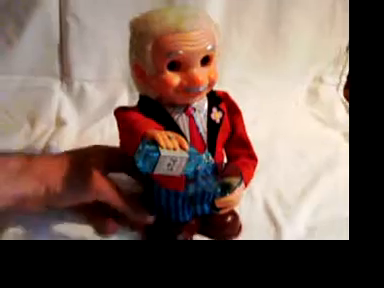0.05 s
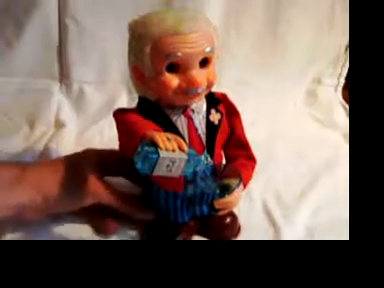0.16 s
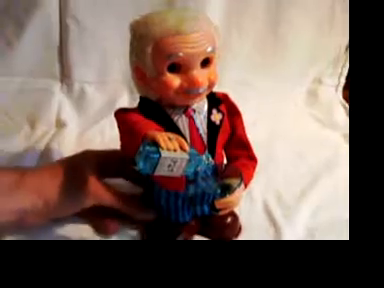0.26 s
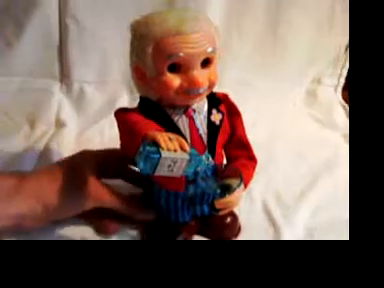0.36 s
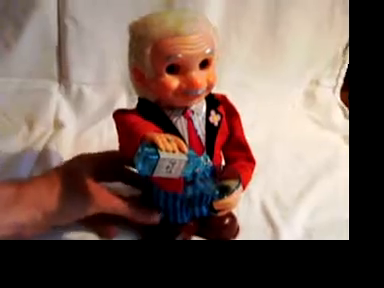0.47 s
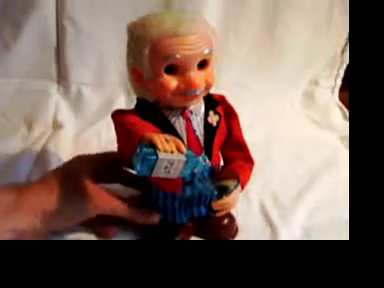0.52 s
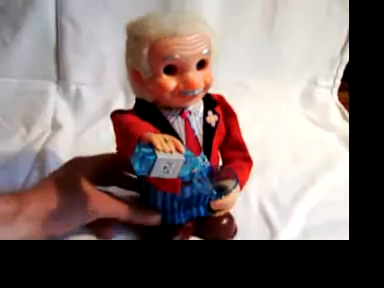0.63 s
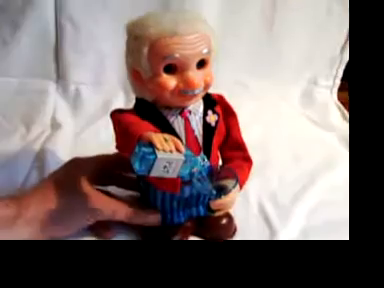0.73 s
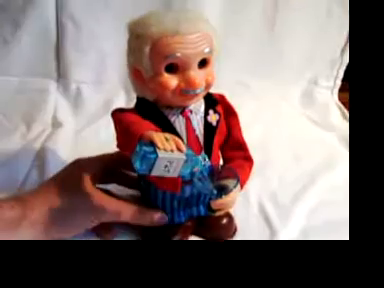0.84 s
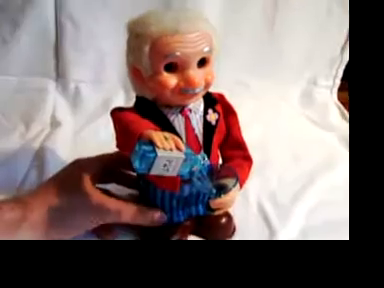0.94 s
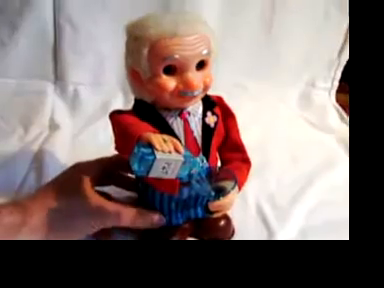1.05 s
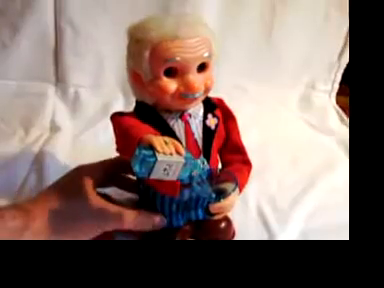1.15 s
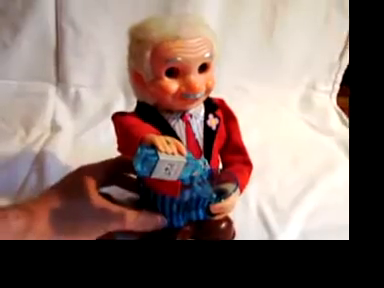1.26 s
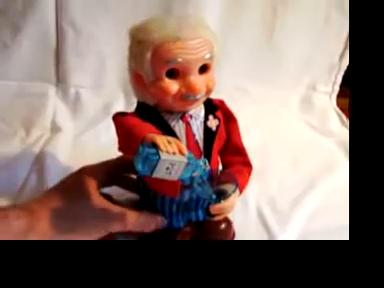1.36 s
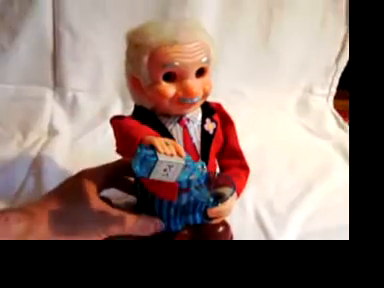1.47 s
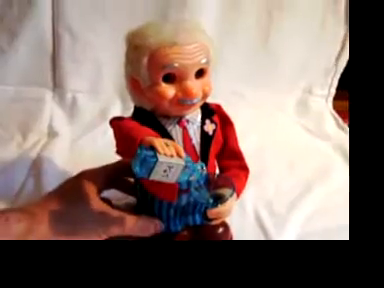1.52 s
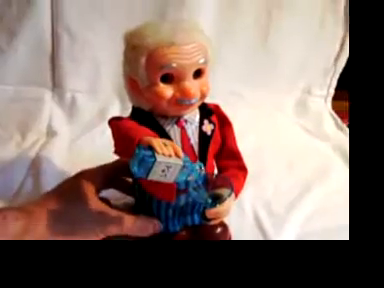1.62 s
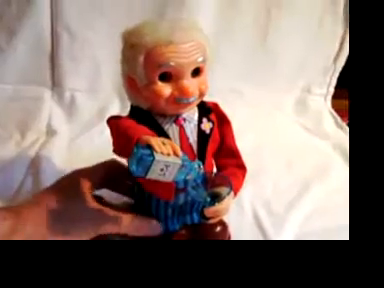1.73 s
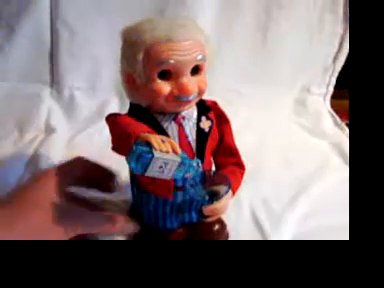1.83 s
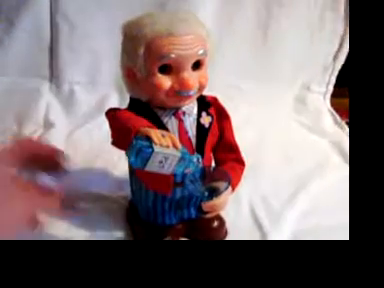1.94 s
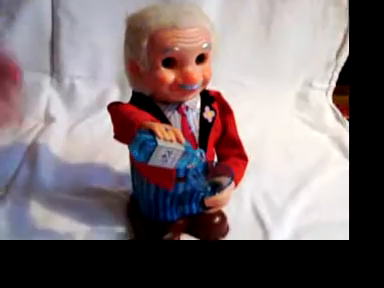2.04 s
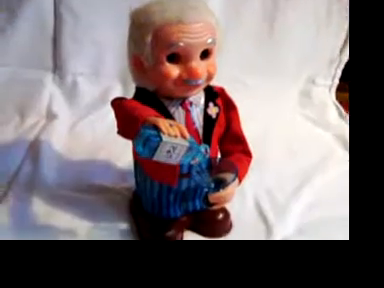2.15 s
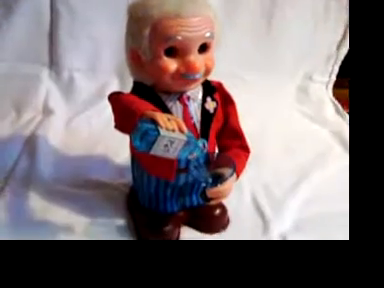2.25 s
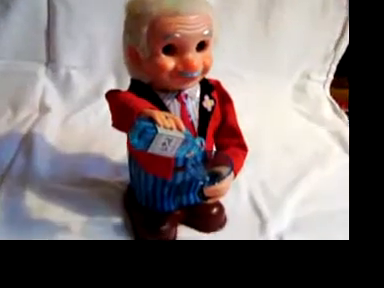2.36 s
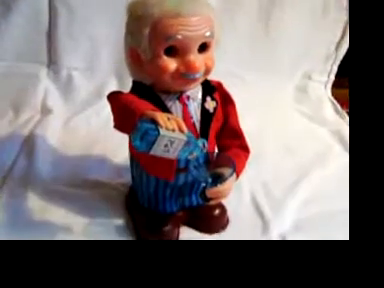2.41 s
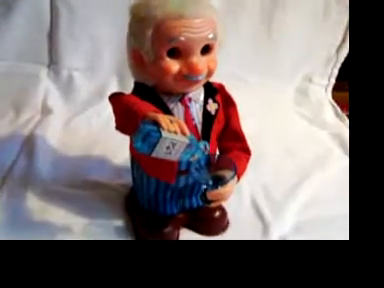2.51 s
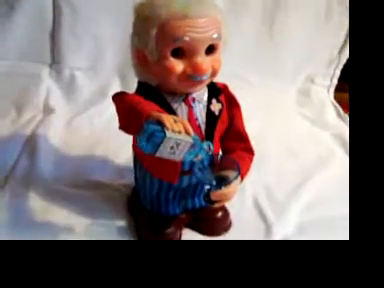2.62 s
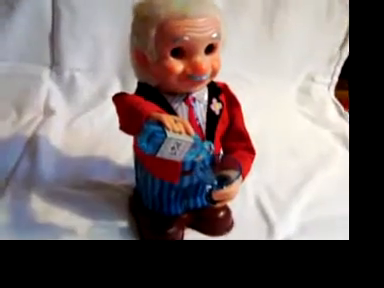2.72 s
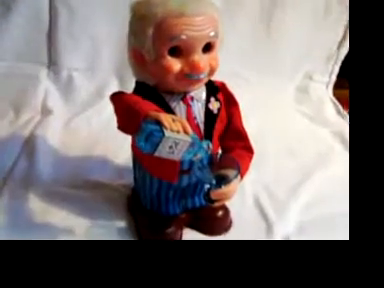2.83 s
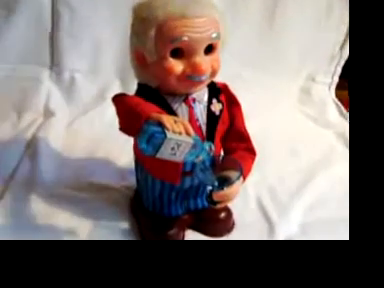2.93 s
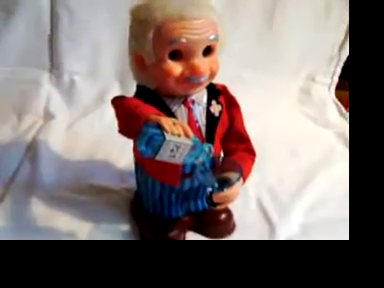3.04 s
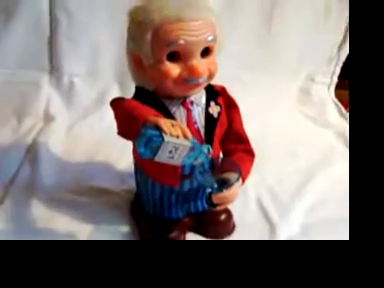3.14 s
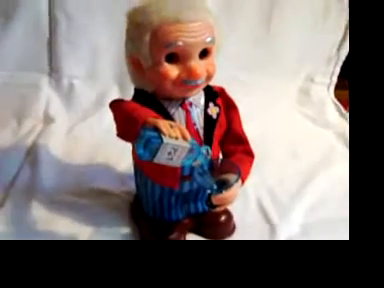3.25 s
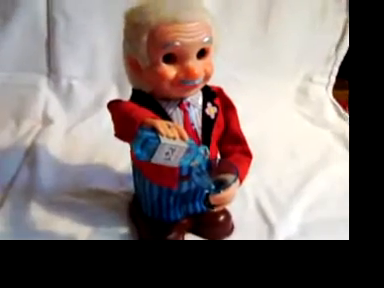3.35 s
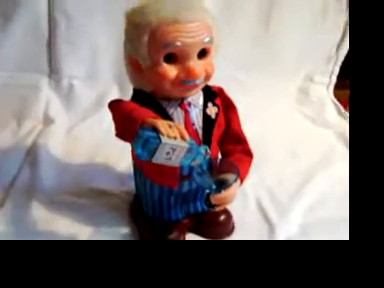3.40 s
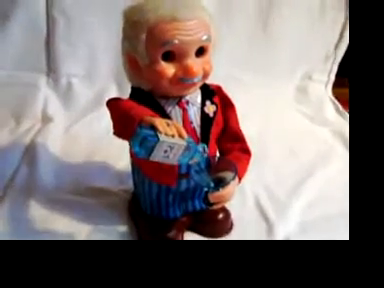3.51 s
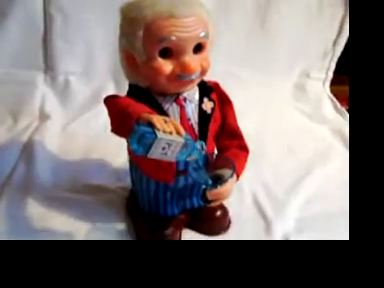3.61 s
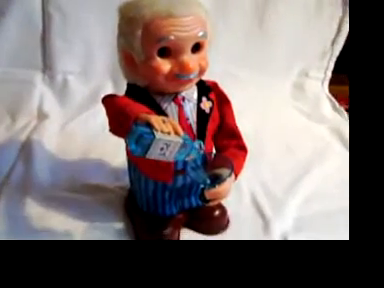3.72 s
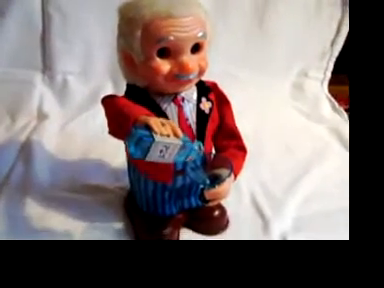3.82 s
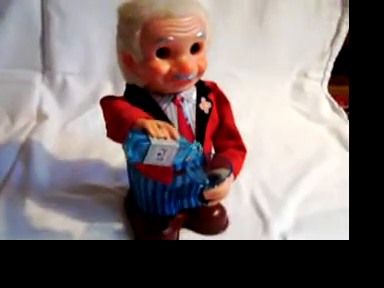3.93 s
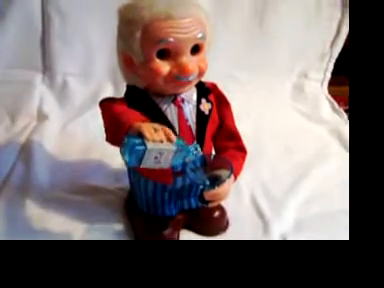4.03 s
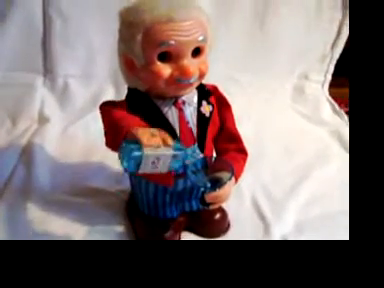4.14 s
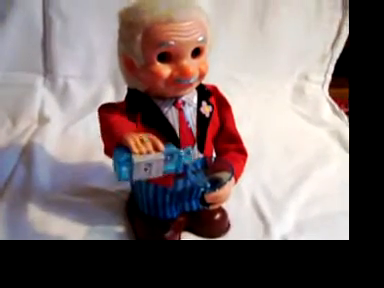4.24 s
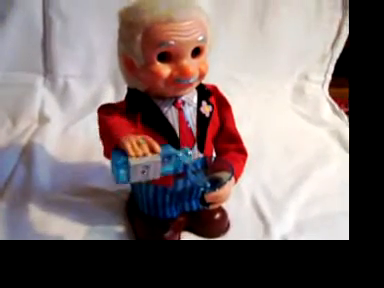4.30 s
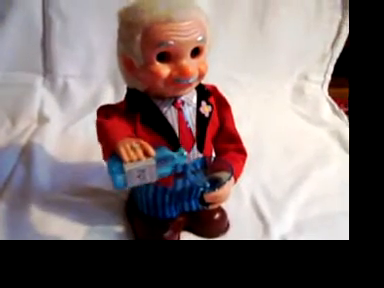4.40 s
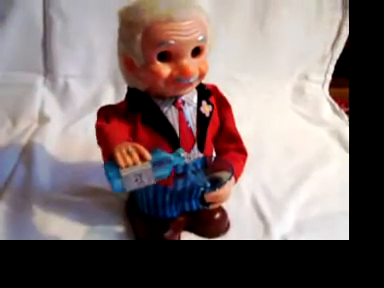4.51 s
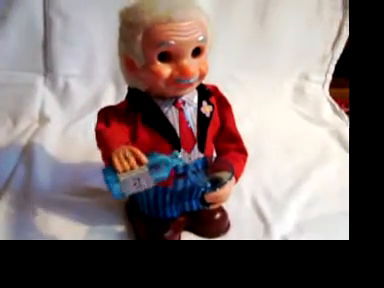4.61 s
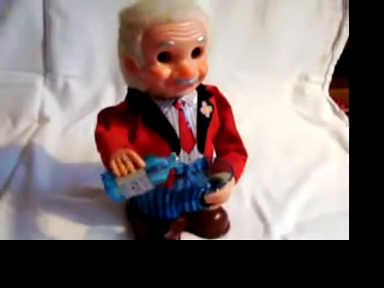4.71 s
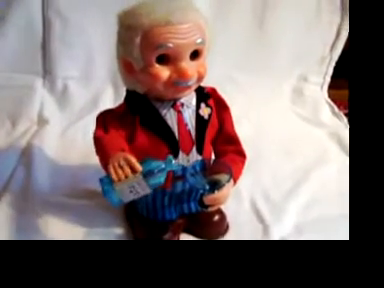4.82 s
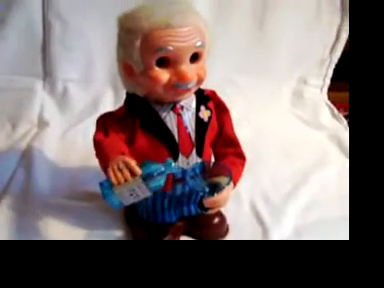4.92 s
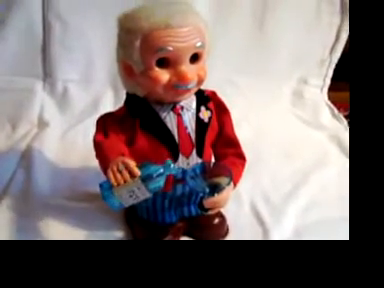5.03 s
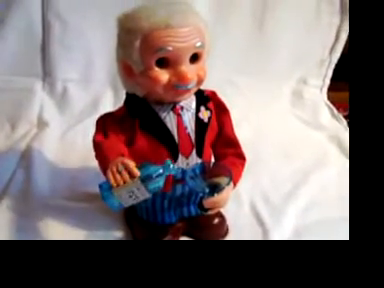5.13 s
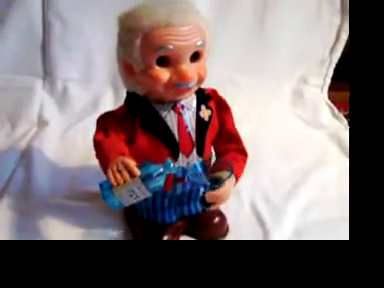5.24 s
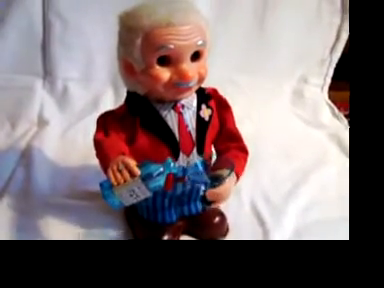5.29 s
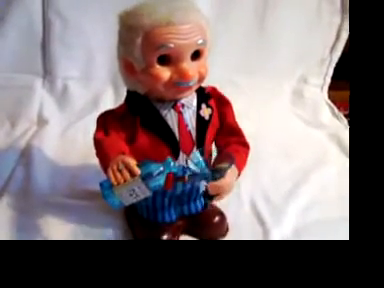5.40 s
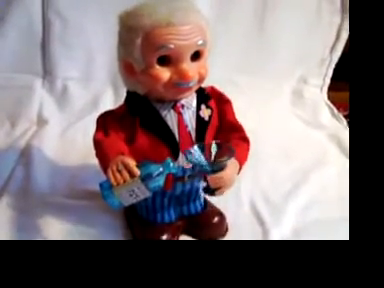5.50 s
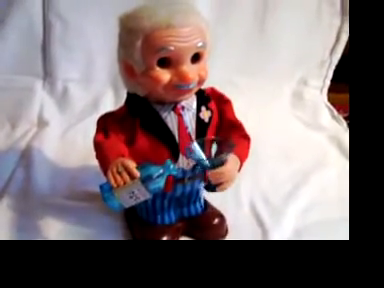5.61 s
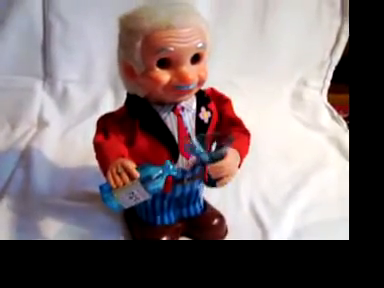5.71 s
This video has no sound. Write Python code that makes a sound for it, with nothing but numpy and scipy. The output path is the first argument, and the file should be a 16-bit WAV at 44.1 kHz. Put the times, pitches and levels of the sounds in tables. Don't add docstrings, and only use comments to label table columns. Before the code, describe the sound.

Quiet room with low murmur and faint ticking. A finger clicks and slides a small switch, with a sharp snap at about one second. A tiny electric motor then spins up quickly and whirrs on, gears buzzing and rattling inside a tin toy on a table. Irregular bursts of hard gear slaps crackle and distort the close, narrow-band microphone, with occasional dull knocks.

```python
import sys
import numpy as np
from scipy import signal
from scipy.fft import rfft, irfft
from scipy.io import wavfile
from scipy.ndimage import uniform_filter1d, minimum_filter1d

SR = 44100
rng = np.random.default_rng(int(sys.argv[2]) if len(sys.argv) > 2 else 0)


def log_audio(samples):
    frames = np.atleast_2d(samples).T
    limited = np.clip(frames, -1, 1)
    pcm = np.round(limited * 32767).astype(np.int16)
    wavfile.write(sys.argv[1], SR, pcm)


def volts_from_decibels(level):
    exponent = np.asarray(level, float) / 20
    return 10 ** exponent


N = 254016
CEILING = 0.72

# [f/Hz, density/dB]
ROOM_SPECTRUM = [(5.9, -47), (10, -12.5), (109, -2.5), (151, -1), (167, -4), (215, -1), (276, -3),
                 (329, -10), (423, -1), (586, -1.5), (994, -14), (2060, -14), (3240, -21), (4060, -28),
                 (5280, -65), (8930, -120)]
# [t/s, peak level/dB]
TICKS = [(0.2344, -35.5), (0.2644, -34.5), (0.4044, -35), (0.4344, -37), (0.5594, -34), (0.5844, -37),
         (0.7144, -34), (0.789, -35), (0.8894, -35), (1.0594, -34.5), (1.1774, -32), (1.2194, -35)]
# [f/Hz, level/dB, t60/s]
TICK_MODES = [(1350, 2, 0.05), (2040, -3, .04), (2790, -1.5, .04)]
# [start t/s, length/s, f/Hz, level/dB]
TABLE_HUMS = [
    (1.467, 0.35, 117.5, -49.5),
    (2.65, 0.19, 124, -55),
    (2.7, .9, 80.4, -42.5),
    (3.6, .2, 117.5, -43),
    (3.694, .15, 78, -49),
    (4.0, 0.18, 111.3, -42),
    (4.185, .9, 75.9, -47.5),
    (4.305, .5, 117.5, -42),
    (4.998, .3, 122.1, -46.5),
    (3.09, 0.89, 239, -41.5),
]
# [t/s, blow level/dB, best-struck f/Hz, fall below it/dB per octave, fall above it/dB per octave]
SWITCH_CLICKS = [
    (0.5261, -13, 1980, 10.5, 11),
    (.7105, -31, 640, 9, 8),
    (0.7612, -16, 1350, 8, 14),
    (0.7638, -17, 710, 6.5, 3.7),
    (0.7682, -28, 1150, 4.5, 12),
    (.781, -29, 1100, 11, 11),
    (0.9807, -6.5, 900, 3.2, 4),
    (0.995, -17.5, 640, 5, 9.7),
    (1.032, -14.5, 1360, 2.2, 8.7),
    (1.289, -8, 1780, 22, 9),
]
# [f/Hz, t60/s]
SWITCH_MODES = [(640, 0.022), (1100, 0.0098), (1700, 0.014), (2550, 0.0098), (3650, 0.0067)]
# [t/s, peak level/dB, f/Hz, t60/s]
KNOCKS = [(.9808, -21, 430, .025), (1.4685, -14, 520, .02), (1.4685, -21, 90, .05), (2.399, -18, 500, .02),
          (2.765, -22, 150, .03), (3.0065, -3.5, 400, .03), (3.009, -9, 660, .03), (3.007, -11, 220, .03),
          (3.0845, -10, 480, .035), (3.1705, -10, 400, .035), (3.93, -25, 90, .05), (5.0535, -13, 380, .03),
          (5.0535, -10, 540, .032)]
# [t/s, shaft f/Hz, rattle level/dB, bearing load level/dB]
MOTOR = [(1.27, 149, -30, -5), (1.3, 155.7, -18, -2.5), (1.36, 170.9, -10, 3), (1.44, 187.2, -8, 1),
         (1.72, 187.4, -13.5, -1), (2.0, 183.8, -13, -3.5), (2.47, 173, -12.5, 0.5), (2.68, 199.7, -12, -2),
         (3.12, 196.1, -9, 0.5), (3.68, 196, -12, -2), (3.85, 199.6, -7.5, 4), (4.24, 197.2, -12, -7),
         (4.41, 196.8, -7, 3), (4.5, 197.3, -12.5, -2), (4.78, 194, -13, -7.5), (5.1, 181.2, -12.5, -1),
         (5.28, 189.6, -12.5, -5.5), (5.76, 177, -14, 3.5)]
# [shaft multiple, level at panel pitch/dB, panel f/Hz, width/Hz]
PANEL_HUMS = [(2, -33.5, 385, 72), (3, -28.5, 595, 81), (4, -29.5, 748, 72)]
# [shaft multiple, level/dB]
UPPER_ORDERS = [(1, -51), (6, -35), (7, -33.5), (12, -24)]
# [f/Hz, density/dB]
SHELL_SPECTRUM = [(150, -43.5), (250, -27), (323, -17), (380, -14.5), (433, -14.5), (593, -10), (636, -9.5),
                  (748, -11.5), (902, -10.5), (1130, -2), (1260, -11.5), (1370, -6.5), (1670, -1),
                  (2290, -2.5), (3980, -8), (5280, -93), (8930, -120)]
# [f/Hz, width/Hz, gain level/dB]
PANELS = [(500, 450, 14), (716, 71, 9), (1122, 74, 4.5), (1377, 178, 9.5), (1523, 37, 10), (1870, 74, 7.5),
          (2118, 160, 7.5), (2264, 89, 10.5), (2458, 150, 5.5), (2930, 160, 7)]
# [t/s, overload level/dB]
SLAPS = [(1.443, -29.5), (1.5674, -41), (2.1755, -27.5), (2.2287, -46), (2.2476, -45.5), (4.1229, -31),
         (4.7178, -39.5), (4.7799, -29), (4.8831, -42), (5.0564, -40), (5.3232, -30.5), (5.383, -50),
         (5.4485, -46), (5.4703, -41), (5.7283, -23), (4.7592, -43.5), (3.1295, -44), (5.7339, -46),
         (5.53, -50)]
# [hardest slap t/s, overload level/dB, chatter before/s, chatter after/s]
BURSTS = [(1.4709, -18.5, 0.0034, 0.00074), (1.5038, -24.5, 0, 0.022), (1.603, -23.5, 0.0082, 0.015),
          (1.7034, -27, 0.026, 0.026), (2.0883, -29.5, 0.0077, 0.043), (2.39, -31.5, 0.0025, 0.034),
          (2.4783, -28.5, 0.0028, 0.019), (2.5503, -33.5, .007, 0.008), (2.654, -21.5, 0.018, 0.013),
          (2.7051, -7, 0.0072, 0.038), (2.764, -25, 0.0097, 0.027), (2.8382, -30.5, 0.023, 0.0064),
          (2.8879, -25.5, 0.019, 0.0059), (2.9676, -19, 0.0066, .04), (3.0325, -25, 0.026, 0.059),
          (3.176, -18.5, 0.0036, 0.033), (3.2397, -24.5, 0.00049, 0.018), (3.3489, -28.5, 0.0084, 0.073),
          (3.5099, -19.5, 0.055, .036), (3.609, -26, 0.049, 0.082), (3.748, -17, 0.018, 0.065),
          (3.8426, -14, 0.021, .012), (3.8642, -12.5, .007, .026), (3.9035, -14.5, 0.034, 0.037),
          (3.98, -25, 0.0066, 0.031), (4.061, -19, 0.015, 0.027), (4.2154, -24.5, 0.0012, 0.029),
          (4.302, -25, 0.02, .026), (4.412, -13, 0.057, 0.005), (4.4482, -20, 0.00062, .026)]


def evened(x):
    return x / np.sqrt(np.mean(x ** 2) + 1e-20)


def curves(rows):
    t_s, *columns = np.transpose(rows)
    return [np.interp(np.arange(N) / SR, t_s, column) for column in columns]


def colour(x, points, peaks=()):
    f_hz = np.fft.rfftfreq(N, 1 / SR)
    point_hz, point_db = np.transpose(points)
    gain_db = np.interp(np.log(f_hz + 1), np.log(point_hz + 1), point_db, left=-90, right=-90)
    for centre_hz, width_hz, top_db in peaks:
        gain_db = gain_db + top_db / (1 + (2 * (f_hz - centre_hz) / width_hz) ** 2)
    return irfft(rfft(x) * volts_from_decibels(gain_db), N)


def drift(f_hz):
    lowpass = signal.butter(2, f_hz, fs=SR, output="sos")
    return evened(signal.sosfilt(lowpass, rng.standard_normal(N)))


def add(mix, t_s, sound):
    part = mix[round(t_s * SR):][:len(sound)]
    part += sound[:len(part)]


def ring(f_hz, t60_s, rise_s=0.000068):
    t = np.arange(6000) / SR
    return np.sin(2 * np.pi * f_hz * t) * volts_from_decibels(-60 * t / t60_s) * (1 - np.exp(-t / rise_s))


def room():
    murmur = evened(colour(rng.standard_normal(N), ROOM_SPECTRUM))
    return volts_from_decibels(-39.54 + 0.9 * drift(25)) * murmur


def ticking():
    out = np.zeros(N)
    tick = sum(volts_from_decibels(db) * ring(hz, t60_s, rise_s=0.00085) for hz, db, t60_s in TICK_MODES)
    for t_s, db in TICKS:
        add(out, t_s, volts_from_decibels(db - 5) * tick)
    return out


def table():
    t = np.arange(N) / SR
    rumble_spectrum = [(20, -28.5), (60, -5), (130, 2.5), (240, 8.5), (330, 3)]
    rumble = evened(colour(rng.standard_normal(N), rumble_spectrum, [(232.5, 6.6, 6)]))
    swell_db = 6.2 * np.exp(-((t - 4.7) / 2.1) ** 2)
    out = volts_from_decibels(-48.5 + swell_db + 1.3 * drift(1.3)) * rumble
    ease_s = 0.062
    for start_s, length_s, hz, db in TABLE_HUMS:
        inside_s = np.minimum(t - start_s, start_s + length_s - t)
        spell = np.clip(inside_s / ease_s + 0.5, 0, 1) ** 2
        out += np.sqrt(2) * volts_from_decibels(db) * spell * np.sin(2 * np.pi * hz * t)
    return out * np.clip((t - 1.28) / 0.05, 0, 1)


def finger_slide():
    out = np.zeros(N)
    start_s, length_s, level_db = 0.69, 0.15, -47
    stroke = np.hanning(round(length_s * SR))
    slips = rng.standard_normal(len(stroke)) ** 3 * stroke
    body = sum(ring(hz, t60_s) for hz, t60_s in SWITCH_MODES[:4])
    add(out, start_s, volts_from_decibels(level_db) * evened(signal.oaconvolve(slips, body)[:len(stroke)]))
    return out


def switch():
    out, t = np.zeros(N), np.arange(600) / SR
    tunes = rng.uniform(0.94, 1.03, (len(SWITCH_CLICKS), 5))
    for (t_s, db, best_hz, below, above), tune in zip(SWITCH_CLICKS, tunes):
        for k, (hz, t60_s) in enumerate(SWITCH_MODES):
            octaves = np.log2(hz / best_hz)
            blow_db = db - max(above * octaves, -below * octaves)
            sign = (-1) ** k
            add(out, t_s, sign * volts_from_decibels(blow_db) * ring(hz * tune[k], t60_s, rise_s=0.0001))
        band = signal.butter(1, [best_hz / 2, best_hz * 2], "band", fs=SR, output="sos")
        crack = evened(signal.sosfilt(band, rng.standard_normal(len(t))))
        add(out, t_s, volts_from_decibels(db - 19 - 60 * t / 0.0081) * crack)
    return out


def knocks():
    out = np.zeros(N)
    for t_s, db, hz, t60_s in KNOCKS:
        knock = ring(hz, t60_s, rise_s=0.0006)
        knock -= 0.6 * ring(2.1 * hz, 0.7 * t60_s, rise_s=0.0003)
        knock += 0.4 * ring(3.2 * hz, 0.6 * t60_s, rise_s=0.0003)
        add(out, t_s, volts_from_decibels(db) * knock)
    return out


def shaft_hums(shaft_hz, turns, rattle_db, load_db):
    hums = []
    for k, db, panel_hz, width_hz in PANEL_HUMS:
        off_panel_db = 10 * np.log10(1 + (2 * (k * shaft_hz - panel_hz) / width_hz) ** 2)
        hums.append((k, db + load_db - off_panel_db))
    hums += [(k, db + rattle_db + 10.5) for k, db in UPPER_ORDERS]
    out = np.zeros(N)
    for k, db in hums:
        level_db = db + 1.0 + 2.17 * drift(50) + 2.06 * drift(7)
        out += np.sqrt(2) * volts_from_decibels(level_db) * np.sin(2 * np.pi * (k * turns + rng.random()))
    return out


def surges():
    busy = np.zeros(N)
    for t_s, _, before_s, after_s in BURSTS:
        add(busy, t_s - before_s - 0.004, np.ones(round((before_s + after_s + 0.008) * SR)))
    return uniform_filter1d(np.minimum(busy, 1), size=900)


def gear_rattle(turns, rattle_db):
    grain_db, teeth_hz = 3.0, 5500
    struck = rng.random(N) < teeth_hz / SR
    force = volts_from_decibels(grain_db * np.minimum(rng.exponential(1, N), 3.5))
    teeth = force * rng.choice([-1., 1.], N) * struck
    once_a_turn = 1 + 0.5 * np.cos(2 * np.pi * turns) + 0.16 * np.cos(4 * np.pi * turns + 1)
    blows = teeth * once_a_turn * volts_from_decibels(0.82 * drift(12) + 1.2 * drift(30) + 0.6 * drift(120))

    seam = 2 * drift(12.07)
    shifted = [(hz * 1.07 if hz > 1500 else hz, width_hz, db) for hz, width_hz, db in PANELS]
    shell = colour(blows * np.cos(seam) ** 2, SHELL_SPECTRUM, PANELS)
    shell += colour(blows * np.sin(seam) ** 2, SHELL_SPECTRUM, shifted)
    shell = signal.sosfilt(signal.butter(2, 280, "high", fs=SR, output="sos"), shell)

    low = signal.sosfiltfilt(signal.butter(2, 950, fs=SR, output="sos"), shell)
    low_db = -14 - 0.42 * np.maximum(rattle_db + 14, -4)
    level_db = rattle_db - 1.2 + 1.5 * surges()
    return volts_from_decibels(level_db) * (evened(shell - low) + volts_from_decibels(low_db) * evened(low))


def motor():
    shaft_hz, rattle_db, load_db = curves(MOTOR)
    shaft_hz = uniform_filter1d(shaft_hz, size=3000)
    waver = 0.00722 * drift(36.3) + 0.008 * drift(5.09)
    turns = np.cumsum(shaft_hz * (1 + waver)) / SR
    out = gear_rattle(turns, rattle_db) + shaft_hums(shaft_hz, turns, rattle_db, load_db)
    return out * np.clip((np.arange(N) / SR - MOTOR[0][0]) / 0.029, 0, 1)


def narrow(x):
    lowpass = signal.firwin(501, 4270, window=("kaiser", 10), fs=SR)
    return signal.oaconvolve(x, lowpass, "same")


def held(x, play=0.67):
    gain = minimum_filter1d(np.minimum(1, play / (abs(x) + 1e-9)), size=101)
    return x * np.convolve(gain, np.hanning(101) / 50, "same")


def all_slaps():
    rows = list(SLAPS)
    least_s, spread_s = 0.0012, 0.008
    soft_db, hard_db = -52, -20
    for (t_s, db, before_s, after_s), draws in zip(BURSTS, rng.random((len(BURSTS), 2, 2, 12))):
        rows.append((t_s, db))
        for way, span_s, (gap, force) in zip((-1, 1), (before_s, after_s), draws):
            away_s = np.cumsum(least_s - spread_s * np.log(1 - gap))
            last = min(int(span_s / (least_s + spread_s)), 11)
            away_s *= span_s / away_s[last]
            for a, f in zip(away_s, force):
                if 0 < a <= span_s * 1.001:
                    rows.append((t_s + way * a, soft_db + f ** 1.5 * (min(db, hard_db) - soft_db)))
    return rows


def slapped(whirr):
    slap_hz, width_s = 2200, 0.00027
    t = np.arange(-88, 89) / SR
    window = np.exp(-0.5 * (t / width_s) ** 2)
    hush_window = np.exp(-0.5 * (t / width_s / 1.01) ** 2)
    hush, slaps = np.zeros(N), np.zeros(N)
    for (t_s, db), (sign, tune) in zip(all_slaps(), rng.uniform(-1, 1, (400, 2))):
        size = np.sign(sign) * CEILING * (1 + 1.56 * volts_from_decibels(0.72 * db))
        swing = np.cos(2 * np.pi * slap_hz * (1 + 0.028 * tune) * t)
        add(slaps, t_s + t[0], size * window * swing)
        add(hush, t_s + t[0], hush_window)
    return whirr * np.clip(1 - hush, 0, 1) + slaps


def scene():
    sources = room() + ticking() + table() + finger_slide() + switch() + motor()
    return (slapped(held(narrow(sources))) + narrow(knocks()))[None]


def roll_off(x):
    return signal.sosfilt(signal.butter(12, 15900, fs=SR, output="sos"), x)


def record(dry):
    on = np.clip((np.arange(N) / SR - 0.119) / 0.017, 0, 1) ** 3
    return roll_off(np.clip(dry * on, -CEILING, CEILING))


dry = scene()
out = record(dry)
log_audio(out)
```